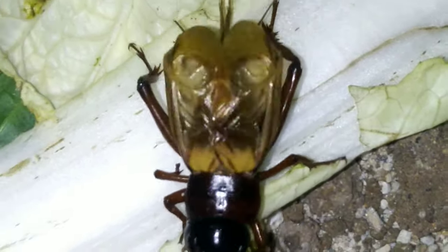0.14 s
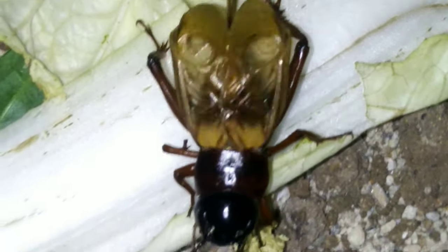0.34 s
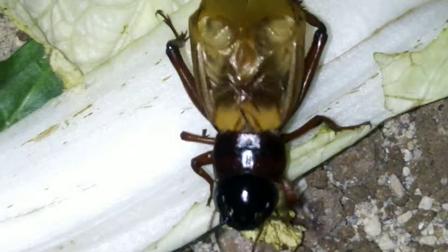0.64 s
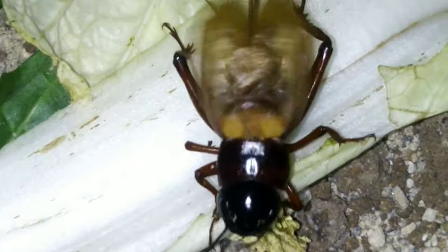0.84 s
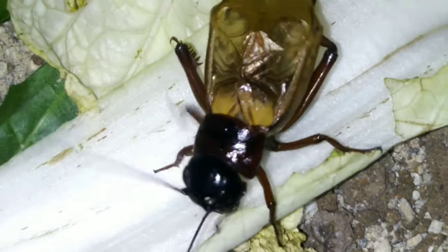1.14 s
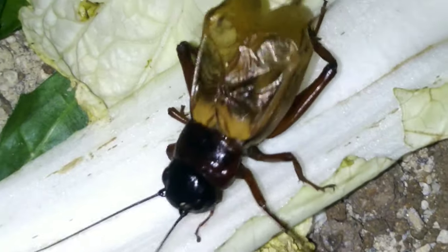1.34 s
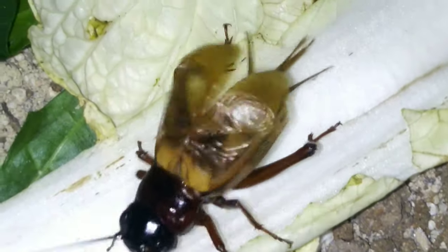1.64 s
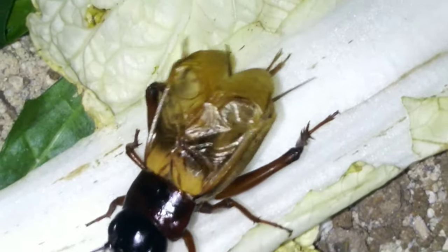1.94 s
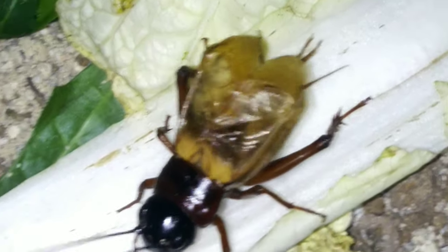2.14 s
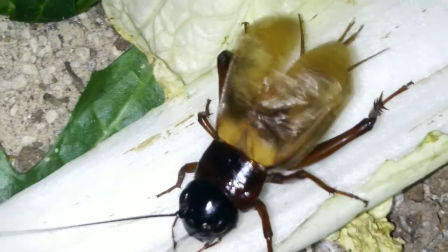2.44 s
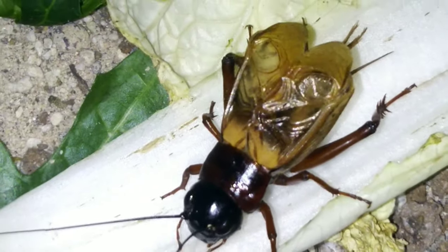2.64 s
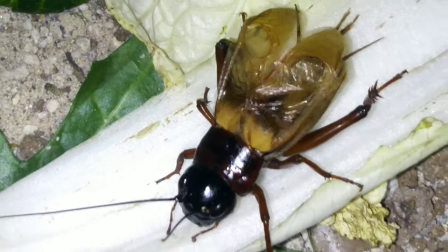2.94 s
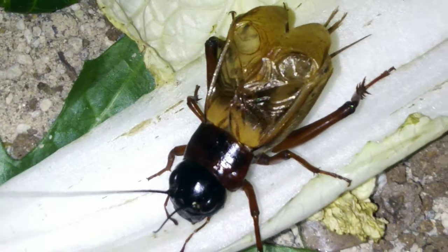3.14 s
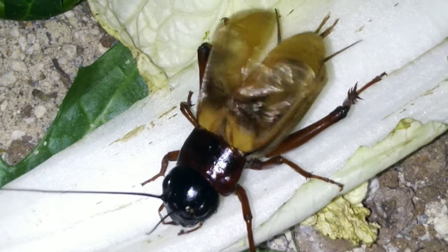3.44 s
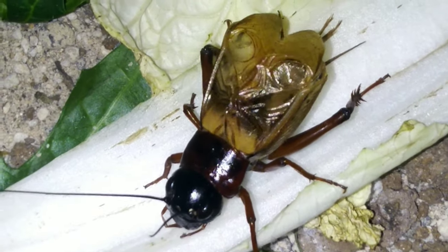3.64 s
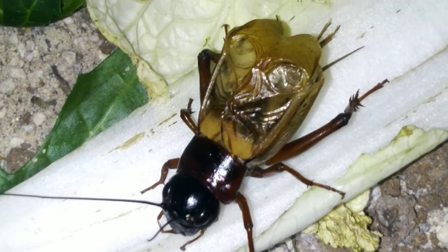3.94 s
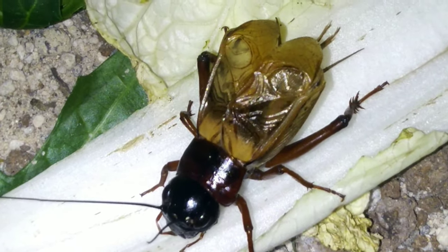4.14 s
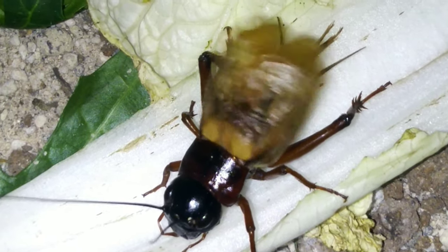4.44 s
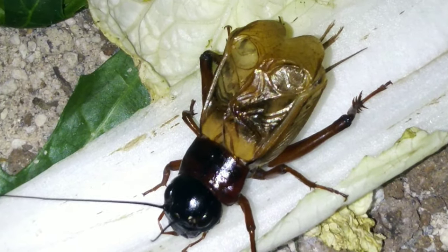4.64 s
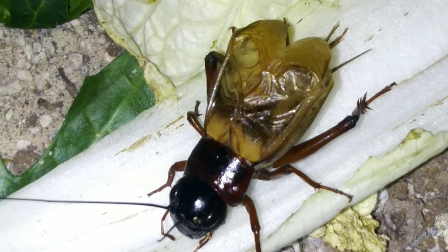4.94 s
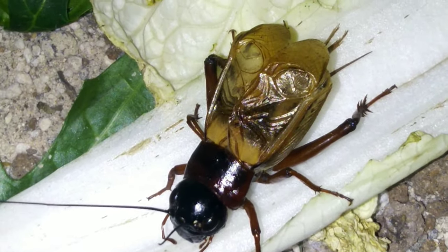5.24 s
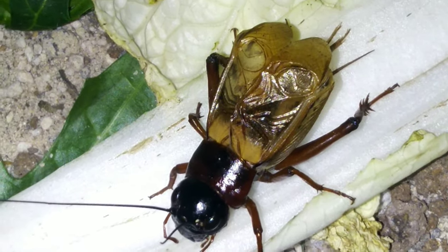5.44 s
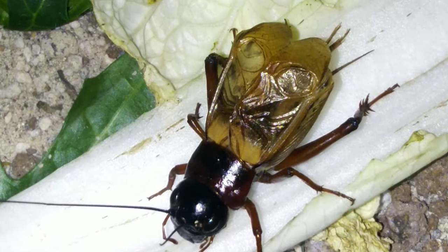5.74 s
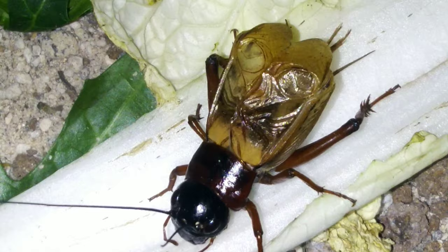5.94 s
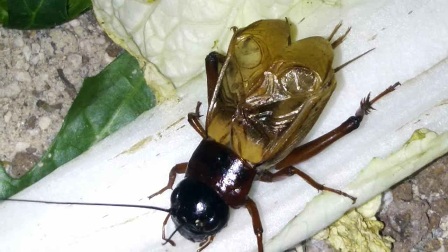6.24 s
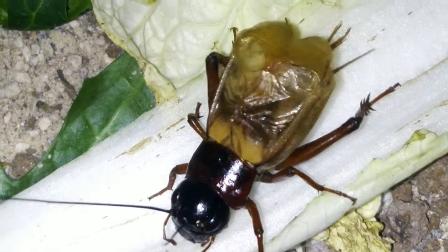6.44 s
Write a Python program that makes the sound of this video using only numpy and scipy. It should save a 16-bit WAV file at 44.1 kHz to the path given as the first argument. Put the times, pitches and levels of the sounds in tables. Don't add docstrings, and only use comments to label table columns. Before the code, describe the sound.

A field cricket chirps loudly up close, bright three-pulse trills repeating several times a second over low room rumble, soft thuds and a faint squeak.

```python
import sys
import numpy as np
from scipy import signal
from scipy.fft import rfft, irfft
from scipy.io import wavfile
from scipy.ndimage import uniform_filter1d

SR = 44100
rng = np.random.default_rng(int(sys.argv[2]) if len(sys.argv) > 2 else 0)


def generate_wav(signal):
    frames = np.transpose(np.atleast_2d(signal))
    scaled = np.clip(frames, -1, 1) * 32767
    pcm = np.round(scaled).astype(np.int16)
    wavfile.write(sys.argv[1], SR, pcm)


def makeup_ratio(level_db):
    decades = np.asarray(level_db, float) / 20
    return 10 ** decades


N = 291060


def evened(x):
    return x / np.sqrt(np.mean(x ** 2) + 1e-20)


def read(points, hz):
    f, value = np.transpose(points)
    return np.interp(np.log(hz + 1), np.log(f + 1), value)


def add(mix, s, sound):
    part = mix[..., round(s * SR):][..., :sound.shape[-1]]
    part += sound[..., :part.shape[-1]]


def coloured(x, spectrum):
    gain = makeup_ratio(read(spectrum, np.fft.rfftfreq(x.shape[-1], 1 / SR)))
    return irfft(rfft(x) * gain, x.shape[-1])


def wobble(noise, size):
    return evened(signal.fftconvolve(noise, np.hanning(size), "same"))


# f/Hz, level/dB per Hz
AIR_SPECTRUM = [(20, -37), (45, 1), (74, 5.5), (180, -7.5), (350, -23.5), (520, -32.5), (1400, -33),
                (2480, -31), (3100, -37), (4500, -37.5), (6800, -70), (8500, -75), (9500, -43.5),
                (15000, -45.5)]
# f/Hz, coherence/1
PORT_COHERENCE = [(60, 0.9), (200, 0.88), (400, 0.27), (800, 0.36), (1300, -0.49), (2400, -0.039)]
# t/s, level/dB
ACTIVITY = [(0, 12.3), (.3, 17.2), (.6, 7.5), (1.7, 6.4), (2.599, 9.7), (2.9, 4), (3.499, 9), (4.5, 4),
            (5.3, 6.7), (6.6, 4)]


def air():
    frames, hz = N // 256 + 5, np.fft.rfftfreq(1024, 1 / SR)
    a, b, c, d, patches = rng.standard_normal((frames, 513, 5)).T
    patches = uniform_filter1d(patches, size=8, axis=0)
    patches = evened(uniform_filter1d(patches, size=14, axis=1))
    activity_db = np.interp(np.arange(frames) * 256 / SR, *np.transpose(ACTIVITY))
    coherence = np.clip(read(PORT_COHERENCE, hz), -1, 1)[:, None]
    left = a + 1j * b
    right = coherence * left + np.sqrt(1 - coherence ** 2) * (c + 1j * d)
    z = np.array([0.85 * left, right])
    above_rumble = np.clip(hz / 500, 0, 1)[:, None]
    z *= makeup_ratio(read(AIR_SPECTRUM, hz)[:, None] + 2.36 * patches + above_rumble * activity_db)
    return makeup_ratio(-46) * evened(signal.istft(z, nperseg=1024, noverlap=768)[1][:, :N])


# t/s, peak level/dB, boom f/Hz, t60/s, clatter level/dB
THUD_EVENTS = [(0.323, -41, 237, 0.65, -5.5), (0.414, -35, 174, 0.13, -12), (0.564, -42.5, 189, 0.48, -30),
               (.742, -34.5, 308.4, 0.37, -24), (1.625, -44, 252, 0.44, -23.5),
               (2.196, -44, 204.4, 0.34, -8.5), (3.047, -32, 256.6, 0.4, -25.5),
               (3.452, -34, 201, 0.38, -8.5), (3.489, -41, 263, 0.33, -8), (3.602, -40, 203, 0.86, -13.5),
               (3.708, -47.5, 330, 0.58, -22), (3.886, -31.5, 263, 0.42, -14),
               (4.166, -41.5, 283.4, 1, -32), (4.225, -35.5, 159, 0.74, -17), (5.129, -25, 244, 0.32, -18)]
# f/Hz, level/dB per Hz
CLATTER_SPECTRUM = [(150, -24), (450, -2), (900, -0.5), (1500, -12.5), (2350, -8), (3300, -22),
                    (5000, -45.5), (9000, -81.5)]


def thuds():
    out, t = np.zeros((2, N)), np.arange(22050) / SR
    noise = rng.standard_normal((len(THUD_EVENTS), 4, len(t)))
    for (s, db, hz, t60, clatter_db), n in zip(THUD_EVENTS, noise):
        mode = [(hz / 4, -50), (hz / 2, -14), (hz * .85, -8), (hz, 0),
                (hz * 1.18, -10), (hz * 2, -20), (hz * 6, -80)]
        knock = np.sin(2 * np.pi * hz * t) * np.exp(-t / 0.039)
        boom = evened(coloured(n[0] + 0.097 * n[:2], mode)) + 2.8 * knock
        clatter = evened(coloured(n[2:] + .5 * n[1], CLATTER_SPECTRUM))
        clatter = makeup_ratio(clatter_db + 7.5 + 3.3 * wobble(n[0], size=1200)) * clatter
        decay = makeup_ratio(db - 6.5 - 60 * t / max(t60, .05))
        add(out, s - .004, decay * np.minimum(t / 0.0052, 1) * (boom + clatter))
    return out


# t/s, level/dB, f/Hz, t60/s
KNOCKS = [
    (5.385, -44, 1240, .25),
    (5.445, -44, 1240, .15),
    (2.22, -49, 1180, .15),
    (3.27, -49, 1230, .15),
    (4.35, -46, 1200, .25),
    (3.452, -36, 2350, .3),
    (3.885, -40, 2300, .35),
]


def metal_knocks():
    out, t = np.zeros((2, N)), np.arange(22050) / SR
    for (s, db, hz, t60), n in zip(KNOCKS, rng.standard_normal((len(KNOCKS), len(t)))):
        phase = np.array([[2.5], [0]]) + 1.2 * wobble(n, size=500)
        ring = np.sin(2 * np.pi * hz * t + phase)
        add(out, s, makeup_ratio(db - 60 * t / max(t60, .03)) * np.minimum(t / 0.0022, 1) * ring)
    return out


# t/s, f/Hz, level/dB
SQUEAK_PATH = [
    (0.509, 1310, -81),
    (0.553, 1262, -52.5),
    (0.62, 1214, -68),
    (0.703, 1252, -57),
    (0.859, 1344, -61.5),
    (1.248, 1420, -70),
    (1.451, 1446, -61),
    (1.62, 1495, -63.5),
    (1.75, 1590, -75.5),
]
# multiple of f/1, level/dB
SQUEAK_HARMONICS = [(1, -10.5), (2, -2.5), (3, -8)]


def hinge():
    s, hz, db = np.transpose(SQUEAK_PATH)
    t = np.arange(N) / SR
    pitch = np.interp(t, s, hz)
    waver = 1 + 0.0015 * wobble(rng.standard_normal(N), size=1500)
    turns = np.cumsum(pitch * waver) / SR
    grip_db = 1.5 * wobble(rng.standard_normal(N), size=3000)
    tight = np.interp(pitch, [1320, 1380, 1450, 1500], [0, 1, 1, 0])
    tone = 0
    for k, g in SQUEAK_HARMONICS:
        tone = tone + makeup_ratio(g) * (tight if k > 2.5 else 1) * np.sin(2 * np.pi * round(k) * turns)
    return tone * makeup_ratio(np.interp(t, s, db, -150, -150) + grip_db + 6.0)


# f/Hz, t60/s
ROOM_T60 = [(100, 0.17), (2000, 0.13), (5600, 0.41), (11500, 0.3), (16000, 0.11)]


def room(x):
    taps = np.zeros((2, SR))
    at = np.arange(140, SR - 20, 20) + rng.integers(0, 20, (2, (SR - 141) // 20))
    np.put_along_axis(taps, at, rng.choice([-1., 1.], at.shape), 1)
    hz, t, z = signal.stft(taps, SR, nperseg=256)
    decay = makeup_ratio(-60 * t / read(ROOM_T60, hz)[:, None])
    tail = signal.istft(z * decay, SR, nperseg=256)[1]
    return signal.fftconvolve(x[None], tail / np.linalg.norm(tail[0]), axes=1)[:, :len(x)]


# first stroke end t/s, to second end t/ms, to third end t/ms, wing f/Hz, early effort level/dB
CHIRP_ROWS = [(.0889, 25, 27, 5682, 1), (.3059, 28, 28.3, 5703, -1), (.6257, 29.5, 28.3, 5705, -1.5),
              (.8497, 28.9, 25, 5725, 0), (1.0712, 24.7, 25.3, 5650, 2), (1.2844, 23.4, 28.8, 5663, 1.5),
              (1.4896, 22.5, 28.2, 5640, 2.5), (1.714, 25.1, 25.3, 5650, 2.5),
              (1.9275, 24.2, 27.3, 5642, 1.3), (2.1278, 27.3, 28.8, 5718, 0),
              (2.4619, 25.5, 28.3, 5669, -3), (2.7563, 26, 27.8, 5684, -2), (3.0246, 25.5, 28.2, 5666, -.3),
              (3.2865, 25.5, 27.9, 5623, 1.7), (3.5145, 25.4, 26.8, 5614, 1), (3.7483, 25.8, 27.5, 5619, 1),
              (4.0503, 26.1, 27.7, 5620, .6), (4.4465, 25.9, 28.4, 5670, 0), (4.7544, 25.1, 28.3, 5644, .2),
              (5.0275, 26.2, 28.9, 5619, 0), (5.5519, 26, 27.8, 5650, -.6), (5.8527, 26.3, 27.8, 5646, -.6),
              (6.1593, 25.9, 27.6, 5646, -1.1), (6.4275, 26.6, 28, 5641, -1.3)]
# t/s, peak level/dB
TOUCH_EVENTS = [(0.0661, -35.8), (0.2842, -30.1), (0.6037, -30.6), (0.8289, -28.8), (1.049, -49.6),
                (1.2641, -52.3), (1.4688, -32.8), (1.6925, -29.3), (1.9057, -32.5), (2.1051, -33.1),
                (2.4379, -32.4), (2.7319, -32.4), (2.9999, -32.7), (3.2614, -33.4), (3.4903, -27.9),
                (3.7236, -32.1), (4.027, -26.9), (4.4222, -31.5), (4.7305, -26.7), (5.0032, -33.0),
                (5.5278, -26.1), (5.8292, -27.4), (6.1356, -27.9), (6.4029, -33.1)]
CATCH_S, REOPEN_S = .0073, .0053


def strokes():
    rows = []
    for chirp, (song_row, (touch, _)) in enumerate(zip(CHIRP_ROWS, TOUCH_EVENTS)):
        end, second_ms, third_ms = song_row[:3]
        waits = np.array([end - touch - CATCH_S + REOPEN_S, second_ms / 1000, third_ms / 1000])
        ends = end + np.cumsum(waits) - waits[0]
        rows += [(ends[place], waits[place] - REOPEN_S, chirp, place) for place in range(3)]
    return rows


def swell(u, early_db, middle_db, late_db):
    heights = makeup_ratio([early_db, middle_db, middle_db, late_db - 1.5, late_db + .5, late_db - 4])
    line = np.interp(u, [.02, .2, .5, .6, .72, .82, .91, .98], [0, *heights, 0])
    return signal.fftconvolve(line, np.hanning(60) / 29.5, "same")


# f/Hz, level/dB per Hz
TOUCH_SPECTRUM = [(3500, -73), (4600, -16.5), (5700, -19), (6600, -22.5), (9000, -35.5), (11300, -4.5),
                  (12800, -33), (15500, -33.5), (16200, -88)]


def scraper_touches():
    out, t, peak_s = np.zeros((2, N)), np.arange(600) / SR, .0025
    for (s, db), noise in zip(TOUCH_EVENTS, rng.standard_normal((len(TOUCH_EVENTS), 600))):
        burst = (t / peak_s) ** 2 * np.exp(2 - 2 * t / peak_s)
        rasp = evened(coloured(noise, TOUCH_SPECTRUM)) * burst
        add(out, s - peak_s, makeup_ratio([[db - 9], [db - 3.5]]) * rasp)
    return out


PITCH_GLIDE = [(0, 1.02), (.2, 1.042), (.4, 1.033), (.6, 1.002), (.8, .973), (1, .945)]
# early level/dB, middle level/dB, late level/dB, late loss/dB per dB of early effort
SWING_RIGHT = [
    (-15.5, -11.5, -6, 0.75),
    (-18, -12, -6, 0.7),
    (-16.5, -13, -6, 0.55),
]
# early level/dB, middle level/dB, late level/dB
SWING_FAR = (-28, -21, -27)
# early level/dB, middle level/dB, late level/dB, later strokes level/dB
OCTAVE_SWING = [
    (-31.5, -27, -28, -4),
    (-35, -26.5, -25.5, -8.5),
]
# t/s, left middle level/dB, octave left level/dB, octave right level/dB
BODY_TURN = [
    (.3, -11.5, 0, 4),
    (.7, -5.5, -3, 2),
    (1.399, -4, 3, 6.5),
    (1.75, -4, -0.5, 4),
    (2, -2, -7, -.6),
    (2.599, 4, -4, -2.5),
    (3.501, 2, 0, 1.8),
    (6.4, 4.7, 0, -1.7),
]
LAG_S = 8 / 44100
STROKE_SPREAD_DB = 1.0


def wing_song():
    out, rows, pose = np.zeros((2, N)), strokes(), np.transpose(BODY_TURN)
    hiss_spectrum = [(6500, -63.5), (9300, -8), (12500, 5.0), (14500, -12.0), (15500, -6), (16200, -88.5)]
    slips = rng.standard_normal((len(rows), 4, 1400))
    for (end, length, chirp, place), slip in zip(rows, slips):
        t = np.arange(round(length * SR)) / SR
        u = t / length
        jitter, flutter, rasp = (wobble(s, size=90)[:len(t)] for s in slip[:3])
        wing_hz, effort_db = CHIRP_ROWS[chirp][3:]
        left_db, *octave_db = (np.interp(end, pose[0], column) for column in pose[1:])
        early, middle, late, loss = SWING_RIGHT[place]
        far = np.add(SWING_FAR, [0, left_db, 0])
        near = np.array([early + effort_db, middle + effort_db, late - loss * effort_db])
        pitch = wing_hz * np.interp(u, *np.transpose(PITCH_GLIDE)) * (1 + .002 * jitter)
        turns = np.cumsum(pitch) / SR
        hiss = evened(coloured(slip[3], hiss_spectrum))[:len(t)]
        for port, base in enumerate((far, near)):
            skew = (1.5 + .3 * slip[0, 0]) * (port == 0)
            levels = base + STROKE_SPREAD_DB * slip[:3, port + 1]
            whistle = swell(u, *levels) * makeup_ratio(.5 * flutter) * np.sin(2 * np.pi * turns + skew)
            *octave_levels, later_db = OCTAVE_SWING[port]
            share_db = later_db * ((place > 0) - 2 / 3) + octave_db[port] + 3.5
            octave = np.sin(4 * np.pi * turns + 1.8 * skew)
            octave = swell(u, *octave_levels) * makeup_ratio(share_db + rasp) * octave
            tone = whistle + octave + makeup_ratio(-43) * np.sin(np.pi * u) * hiss
            add(out[port], end - length + LAG_S * (port == 0), tone)
    return out


def duck_db():
    t, out, rows = np.arange(N) / SR, np.zeros(N), strokes()
    for first, last in zip(rows[::3], rows[2::3]):
        start, end = first[0] - first[1], last[0]
        corners = [start - .004, start + 0.012, end + 0.01, end + 0.27]
        out = np.minimum(out, np.interp(t, corners, [1.5, -8.0, -6, 7.0]))
    return uniform_filter1d(out, size=200)


# f/Hz, level/dB
WING_DIRECTIVITY = [(4500, 11), (5450, -0.5), (5950, 1), (10600, -1), (11900, 1), (12400, 0)]
WALL_S, WALL_DB = .0135, -15.5


def scene():
    song = wing_song() + scraper_touches()
    song = song / makeup_ratio(duck_db())
    squeak = hinge()
    wall = makeup_ratio(WALL_DB) * np.roll(song, round(WALL_S * SR), axis=1)
    before = round(.22 * SR)
    thrown = np.concatenate([song[:, :before], song], axis=1).sum(0)
    thrown = coloured(thrown, WING_DIRECTIVITY)
    echo = room(thrown)[:, before:] * makeup_ratio([[-21], [-14]])
    squeak_heard = squeak * np.array([[.3], [.8]]) + 1.77 * room(squeak)
    return song + wall + echo + air() + thuds() + metal_knocks() + squeak_heard


# t/s, level/dB, f/Hz
OVERLOAD_POPS = [
    (0.108, -31.5, 250),
    (.135, -26, 250),
    (0.327, -38, 300),
    (5.08, -49, 590),
    (6.209, -43, 540),
    (6.478, -43, 490),
]


def overload_pops():
    out, t = np.zeros((2, N)), np.arange(-300, 300) / SR
    for s, db, hz in OVERLOAD_POPS:
        pop = np.exp(-(t / 0.0013) ** 2) * np.sin(2 * np.pi * hz * t)
        add(out, s - .0068, makeup_ratio([[db - 35.5], [db]]) * pop)
    return out


def top_cut(x):
    return signal.sosfilt(signal.butter(12, 16470, fs=SR, output="sos"), x)


def record(dry):
    out = dry * makeup_ratio(duck_db()) + overload_pops()
    out = coloured(out, [(20, -30), (45, 0), (16000, 0), (16400, -90)])
    return top_cut(out)


dry = scene()
out = record(dry)
generate_wav(out)
```